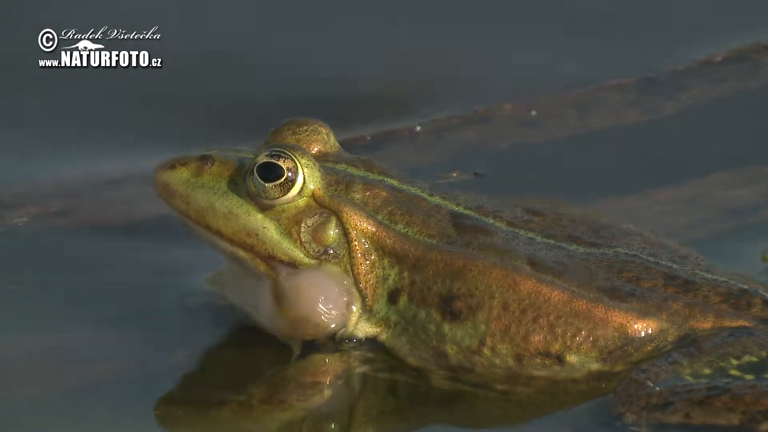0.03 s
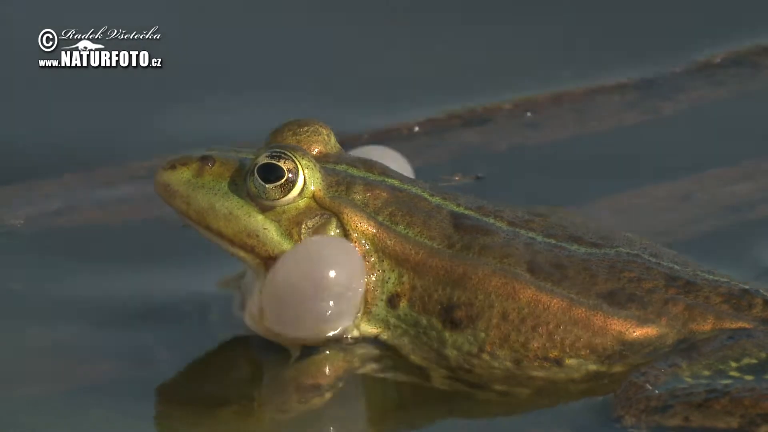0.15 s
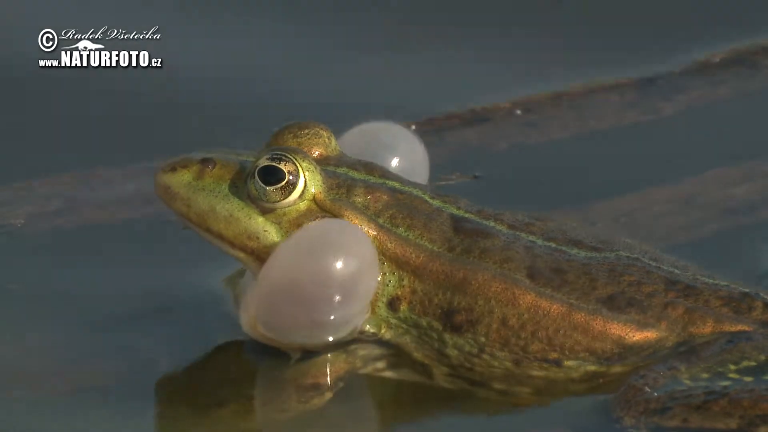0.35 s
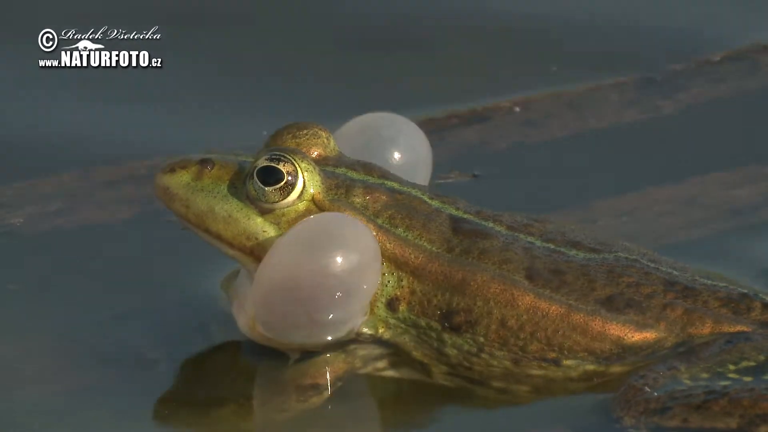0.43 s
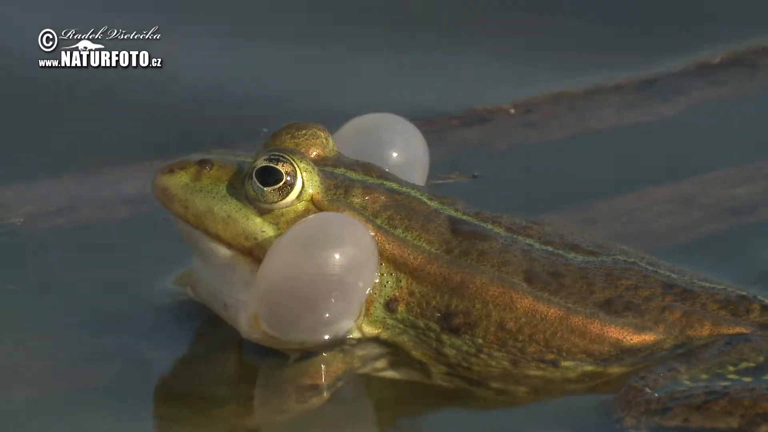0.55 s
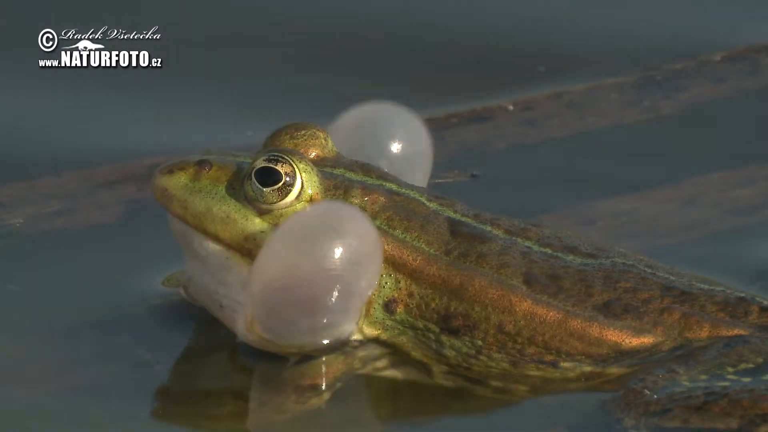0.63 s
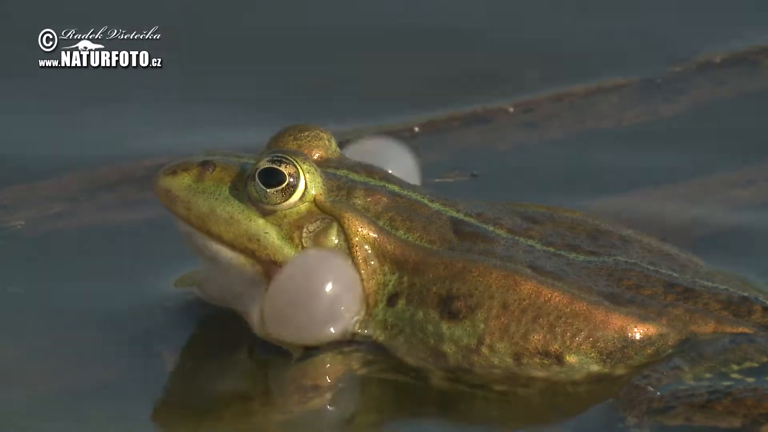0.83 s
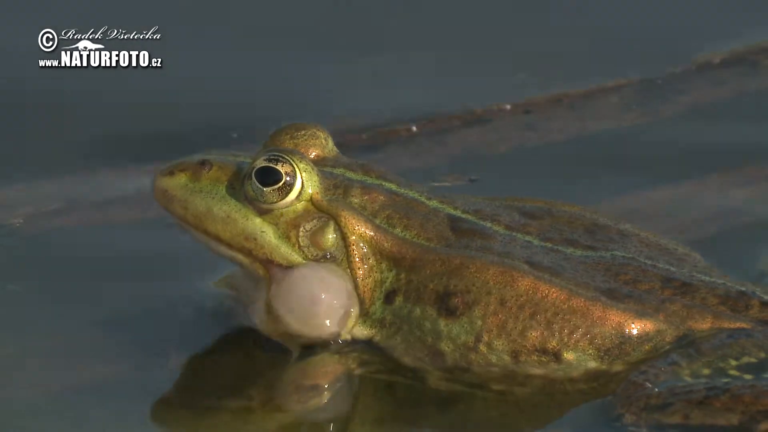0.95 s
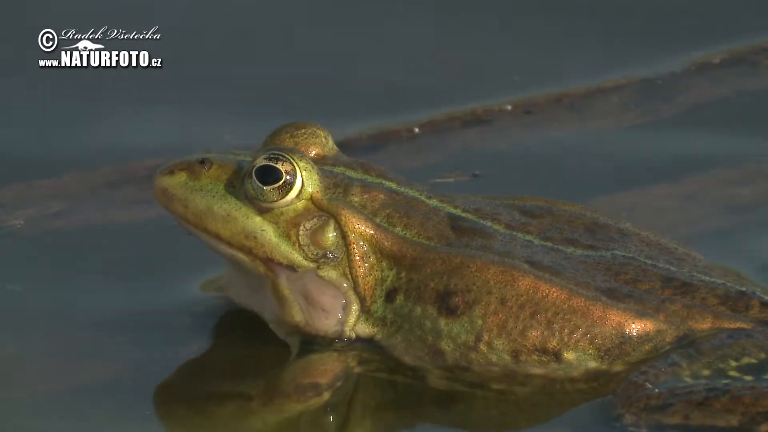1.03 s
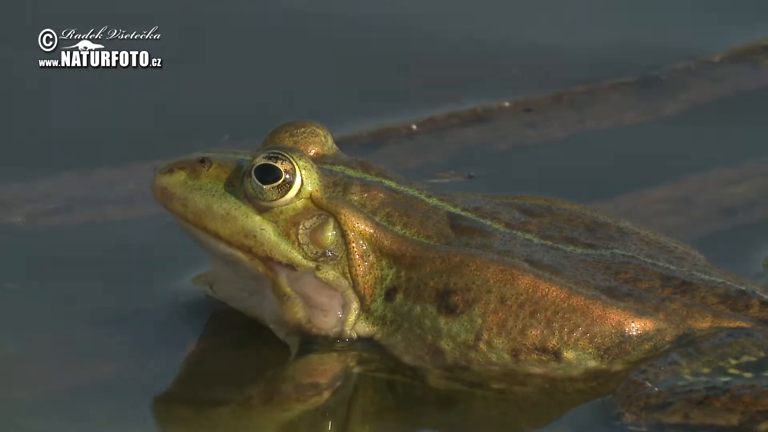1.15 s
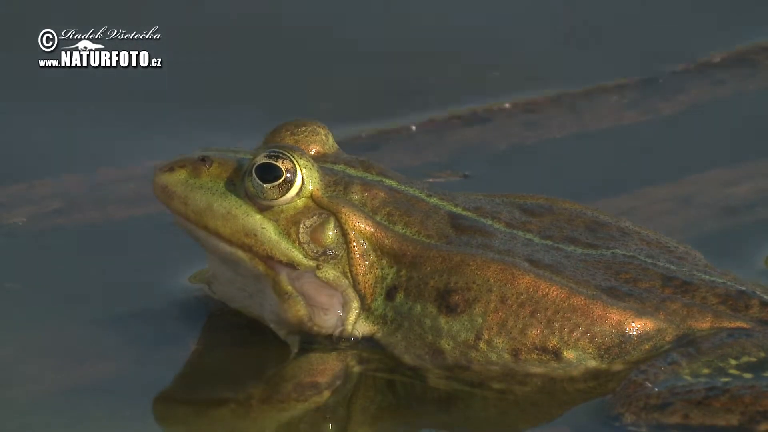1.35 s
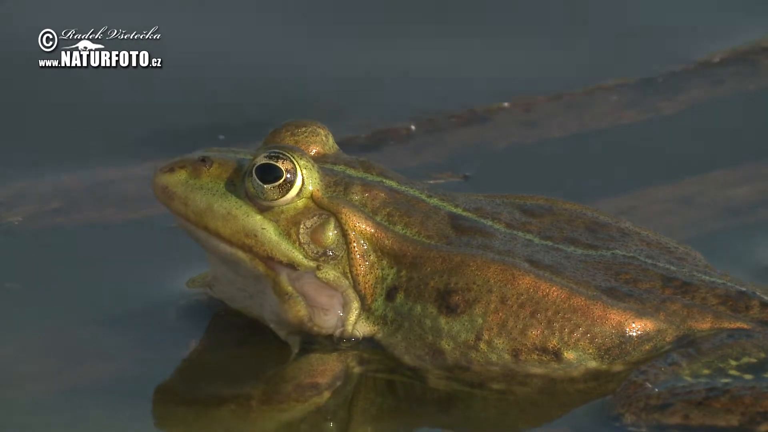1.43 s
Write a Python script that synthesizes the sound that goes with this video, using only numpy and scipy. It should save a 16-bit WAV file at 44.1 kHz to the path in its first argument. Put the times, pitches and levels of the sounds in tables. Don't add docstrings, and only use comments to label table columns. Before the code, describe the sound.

Close frogs give overlapping hard, throaty rattles by quiet water, then a softer rattle fades out.

```python
import sys
import numpy as np
from scipy import signal
from scipy.fft import rfft, irfft, next_fast_len
from scipy.io import wavfile
from scipy.ndimage import uniform_filter1d

SR = 44100
rng = np.random.default_rng(int(sys.argv[2]) if len(sys.argv) > 2 else 0)


def wrap_up_sound(samples):
    columns = np.atleast_2d(samples).T
    tamed = np.clip(columns, -1, 1)
    steps = np.round(tamed * 32767).astype(np.int16)
    wavfile.write(sys.argv[1], SR, steps)


def field_ratio(decibels):
    return 10 ** (np.asarray(decibels, dtype=float) / 20)


N = 66150

# f/Hz, density/dB
AIR_COLOUR = [(150, -10), (360, -19), (600, -14), (1900, -32), (4500, -34), (7000, -40), (15700, -37)]
RUMBLE_COLOUR = [(8.8, -36.5), (15, -2), (38, -1.5), (57, -11.5), (145, -20), (250, -35), (320, -66.5),
                 (550, -120)]
AIR_DB, RUMBLE_DB = -72.5, -62.5
# f/Hz, coherence
COHERENCE = [(30, 0.98), (150, 0.97), (600, 0.95), (3000, .4), (9000, .2)]
# f/Hz, level/dB
HUM = [(50, -69), (296, -84)]
# t/s, duration/s, level/dB, f/Hz
CROAKS = [
    (-.03, 0.074, -57.5, 283),
    (.105, .035, -72, 283),
    (0.148, .04, -65, 278.5),
    (1.084, .04, -61.5, 263),
    (1.225, .08, -55, 260),
]
# multiple of the pitch, level/dB
CROAK_HARMONICS = [(2, -2), (3, -21), (6, -7), (9, 2), (12, -18.5)]
# t/s, duration/s, level/dB, start f/Hz, end f/Hz
CHEEPS = [
    (.11, .025, -81, 4050, 3950),
    (1.27, .065, -78, 4000, 3000),
    (1.285, .055, -79, 4600, 3600),
]
# t/s, level/dB
RASPS = [
    (0.899, -71),
    (1.011, -72.5),
    (1.126, -72),
    (1.233, -78),
]
# f/Hz, bandwidth/Hz, level/dB
RASP_BANDS = [(5146, 750, 6), (5800, 630, -7), (6850, 900, -8), (14800, 1500, -8)]
RASP_S = .075
# t/s, level/dB
CHORUS_SWELL = [
    (0.148, -80.5),
    (0.301, -50),
    (.6, -43.5),
    (1.001, -49),
    (1.248, -59),
    (1.5, -53),
]
# f/Hz, level/dB, t60/s
CHORUS_MODES = [(5250, -36, .008)]
CHORUS_PER_S, CHORUS_HZ, CHORUS_SPREAD = 360, 1913, 0.03

# t/s of main click, level/dB, gap before it/ms, growth per click/dB,
# gap to one late click/ms (1 or less: none)
NEAR_BURSTS = [(.1745, -34, 4.3, 1.5, 5.8), (.2072, -30.5, 5.6, 6.5, 7.4), (.2488, -28, 5.5, 4, 1),
               (.2961, -22.5, 6, 4.5, 9.8), (.3404, -22.5, 5.3, 4, 1), (.3929, -19.5, 6.2, 5.5, 11.1),
               (.4435, -18, 6.4, 4, 12.1), (.4962, -18.5, 5.5, 8.5, 10.5), (.5482, -18.5, 6.3, 8, 8),
               (.6049, -17, 5.1, 4.5, 6.1), (.6596, -18.5, 4.8, 4, 1), (.7151, -18, 4.2, 6, 5.7)]
RIGHT_BURSTS = [(.5241, -35, 2.3, 12, 17), (.5757, -30, 3.8, 2.5, 2.5), (.6372, -28, 3.8, 4.1, 1),
                (.673, -24.5, 4.8, 6, 1), (.7345, -22, 3.5, 12, 0.5), (.7729, -16.5, 6.5, 8, 14.9),
                (.8244, -16, 5, 10, 13.7), (.8817, -15.5, 7.1, 7.5, 12.1), (.9426, -14.5, 6.8, 6.3, 1),
                (1.0018, -14.5, 7.1, 7, 1), (1.0618, -17, 6.5, 6.5, 13.1), (1.123, -19, 5.6, 4.5, 8.6),
                (1.1756, -19.5, 4.94, 5, 5.2)]
LEFT_BURSTS = [
    (1.1603, -38, 6.5, 4.4, -1.5),
    (1.2208, -31, 5.3, 5.2, 9.5),
    (1.2761, -31.5, 5.6, 5.5, 1),
    (1.3324, -33, 5.2, 6, 1),
    (1.3924, -28.5, 5.6, 5.5, 7.7),
    (1.4459, -31, 5, 2.5, 1),
    (1.4965, -34.5, 4.8, 6, 2),
]
# t/s, level/dB
NEAR_CLICKS = [(0.187, -39), (.2557, -24), (.3474, -20), (.6652, -18), (.6971, -29), (0.2238, -38),
               (.2653, -30.5), (0.3615, -32), (.423, -39.5), (.6276, -24.5), (0.6784, -19), (0.7254, -19),
               (0.7352, -28.5), (0.7459, -34.5)]
RIGHT_CLICKS = [
    (.469, -35.5),
    (0.4766, -31),
    (.6814, -19),
    (1.1856, -21),
    (1.191, -17.5),
    (1.1986, -18.5),
    (1.2132, -30.5),
]
LEFT_CLICKS = [(1.2512, -42.5), (.5714, -29), (.6924, -31), (1.2835, -29), (1.3065, -36), (1.3391, -29),
               (1.4136, -39), (1.4521, -29), (1.3592, -41.5), (1.423, -37.5), (1.4673, -35), (1.4731, -39)]
FAR_CLICKS = [
    (0.8491, -30),
    (.8564, -34),
    (.911, -30.5),
    (0.9525, -39),
    (0.9624, -33.5),
    (0.9707, -32),
    (1.0142, -33.5),
    (1.0223, -32),
]
# t/s, ring f/Hz, body thump level/dB
NEAR_SAC = [
    (.165, 1170, -10.5),
    (.2, 1543, -18),
    (.25, 1802, -21.5),
    (.4, 1963, -25.5),
    (.55, 2028, -23),
    (.6, 1772, -23),
    (.66, 1764, -24),
    (.725, 1830, -20),
    (.745, 1620, -0.5),
]
RIGHT_SAC = [
    (.5, 1843, -18),
    (0.682, 1797, -20),
    (0.734, 2032, -23.5),
    (.78, 2045, -24),
    (.89, 2135, -27),
    (1.003, 2094, -28),
    (1.059, 1907, -26.5),
    (1.12, 1735, -22),
    (1.193, 1810, -19),
    (1.216, 2050, -0.5),
]
LEFT_SAC = [
    (.7, 1930, -40),
    (1.23, 2170, -48.5),
    (1.34, 2210, -21.5),
    (1.395, 2074, -31),
    (1.449, 1880, -25),
]
FAR_SAC = [
    (.9, 1830, -13),
]
# f/Hz, level/dB, t60/s
NEAR_MODES = [(3300, -40, .002), (5300, -31.5, .009), (5900, -46, .004), (4300, -36, .002),
              (10400, -41, .004), (11500, -41, .004), (12700, -37.5, .005), (15300, -49, .003)]
RIGHT_MODES = [(3700, -31, .003), (4280, -29, .0049), (5100, -25.5, .009), (14600, -63.5, .0044)]
LEFT_MODES = [(3700, -40, .003), (5100, -39.5, 0.01), (11000, -52, .006)]
# delay/ms, left gain, right gain
ECHOES = [(1.3, 0.067, 0.083), (2.4, 0.061, -0.061), (6.5, 0.17, -0.059), (11.5, .08, -.08)]

QUICK_GAP_MS, GAP_SHRINK, RISE_S = 3.7, 0.44, 0.001158
LATE_DB, LATE_DB_PER_MS, LATE_FLOOR_DB = 12, 2.8, -0.9
THUMP_HZ, THUMP_RATIO, THUMP_T60_S = 428, .225, 0.041
SLAP_HZ, SLAP_T60_S, SLAP_DB = 970, 0.0016, 6
SLACK_LOSS, TAUT_DB, LOOSE_POWER = .55, -20, 1.6
TAUT_HZ, TAUT_POWER = 1750, 10
BRIGHT_POWER = 0.55
PITCH_SCATTER, PUFF_S, PUFF_SHARE = .01, .0008, .45
LOW_CUT_HZ = 340
POND_T60_S, POND_DB = 0.42, -17.5
TWIST_HZ, TWIST_WIDTH_HZ = 2900, 250


def resonate(x, hz, width):
    turn = np.exp(2j * np.pi * np.cumsum(hz * np.ones(len(x))) / SR)
    r = np.exp(-np.pi * width / SR)
    return 2 * (turn * signal.lfilter([1 - r], [1, -r], x / turn + 1e-18)).real


def ring(clicks, hz, t60):
    width = np.log(1000) / np.pi / t60
    return resonate(clicks, hz, width) / (2 * (1 - np.exp(-np.pi * width / SR)))


def evened(x):
    return x / np.sqrt(np.mean(x ** 2) + 1e-20)


def bump(start, length):
    return np.sin(np.pi * np.clip((np.arange(N) / SR - start) / length, 0, 1))


def place(x, lag_ms, pan_db, twist=0):
    size = next_fast_len(N + 2048)
    hz = np.fft.rfftfreq(size, 1 / SR)
    paths = 1
    for ms, left, right in ECHOES:
        paths = paths + np.array([[left], [right]]) * np.exp(-2j * np.pi * hz * ms / 1000)
    phase = 2 * np.pi * hz * lag_ms / 1000 + twist / (1 + np.exp((TWIST_HZ - hz) / TWIST_WIDTH_HZ))
    side = np.array([[.5], [-.5]])
    spectrum = rfft(x, size) * paths * field_ratio(side * pan_db) * np.exp(-1j * side * phase)
    return irfft(spectrum, size)[:, :N]


def noise(colour, level_db, patchy_db):
    frames, hz = N // 256 + 5, np.fft.rfftfreq(1024, 1 / SR)
    a, b, c, d, patches = rng.standard_normal((frames, 513, 5)).T
    patches = uniform_filter1d(uniform_filter1d(patches, size=10, axis=0), size=10, axis=1)
    patches = evened(patches)

    def read(points):
        f, value = np.transpose(points)
        return np.interp(np.log(hz + 1), np.log(f + 1), value)[:, None]

    same = np.clip(read(COHERENCE), -1, 1)
    left = a + 1j * b
    right = same * left + np.sqrt(1 - same ** 2) * (c + 1j * d)
    z = np.array([left, right]) * field_ratio(read(colour) + patchy_db * patches)
    return field_ratio(level_db) * evened(signal.istft(z, nperseg=1024, noverlap=768)[1][:, :N])


def steady_hum():
    t = np.arange(N) / SR
    return sum(field_ratio(db + 5) * np.sin(2 * np.pi * hz * t) for hz, db in HUM)


def croaking_neighbour():
    t = np.arange(N) / SR
    croak = 0
    for s, length, db, pitch in CROAKS:
        tone = sum(field_ratio(d) * np.sin(2 * np.pi * k * pitch * t) for k, d in CROAK_HARMONICS)
        croak = croak + field_ratio(db) * bump(s, length) * tone
    rough = 1 + .25 * evened(uniform_filter1d(rng.standard_normal(N), size=250))
    return place(croak * rough, lag_ms=0.038, pan_db=-0.5)


def bird_cheeps():
    t = np.arange(N) / SR
    cheep = 0
    for s, length, db, start_hz, end_hz in CHEEPS:
        hz = np.interp(t, [s, s + length], [start_hz, end_hz])
        cheep = cheep + field_ratio(db) * bump(s, length) * np.sin(2 * np.pi * np.cumsum(hz) / SR)
    return place(cheep, lag_ms=0.03, pan_db=6.0)


def chorus():
    strength = field_ratio(3. * np.minimum(rng.exponential(1, N), 3))
    clicks = strength * (rng.random(N) < CHORUS_PER_S / SR)
    who, out = rng.integers(0, 4, N), 0
    for k, (tone, side) in enumerate(rng.uniform(-1, 1, (4, 2))):
        sac = [(0, CHORUS_HZ * (1 + CHORUS_SPREAD * tone), -66.5)]
        voice = frog(clicks * (who == k), sac, CHORUS_MODES, t60=0.0083)
        out = out + place(voice, lag_ms=.04 * side, pan_db=-3 * side)
    return evened(out) * field_ratio(np.interp(np.arange(N) / SR, *np.transpose(CHORUS_SWELL)))


def cord_clicks(bursts, singles, start=0, count=7):
    rows, k = list(singles), np.arange(count)
    for s, db, gap_ms, growth_db, late_ms in bursts:
        gaps_ms = QUICK_GAP_MS + (gap_ms - QUICK_GAP_MS) * GAP_SHRINK ** k
        back_ms = np.cumsum(gaps_ms)
        rows.append((s, db))
        rows += zip(s - back_ms / 1000, db - growth_db * (k + 1))
        if late_ms > 1:
            rows.append((s + late_ms / 1000, db + max(LATE_DB - LATE_DB_PER_MS * late_ms, LATE_FLOOR_DB)))
    s, db = np.transpose([row for row in rows if row[0] > start])
    at = np.clip(((s - RISE_S) * SR).astype(int), 0, N - 1)
    return -np.bincount(at, field_ratio(db), N)


def sac_tones(clicks, hz, t60, size=1500):
    at, u = np.flatnonzero(clicks)[:, None], np.arange(size) / SR
    pitch = (hz * (1 + PITCH_SCATTER * rng.standard_normal(N)))[at]
    fade = t60 * np.minimum(pitch / TAUT_HZ, 1) ** LOOSE_POWER
    tones = clicks[at] * field_ratio(-60 * u / fade) * np.cos(2 * np.pi * pitch * u)
    return np.bincount((at + np.arange(size)).ravel(), tones.ravel(), N + size)[:N]


def bright_modes(clicks, hz, modes):
    snap = np.minimum(hz / TAUT_HZ, 1) ** TAUT_POWER * abs(clicks) ** BRIGHT_POWER
    r = np.exp(-1 / (PUFF_S * SR))
    breath = rng.standard_normal(N) * signal.lfilter([np.sqrt(1 - r ** 2)], [1, -r], snap)
    puff = (1 - PUFF_SHARE) * snap + PUFF_SHARE * breath
    return sum(field_ratio(db) * ring(ring(puff, f, t60), f, t60 / 3) * 20 / (t60 * SR) for f, db, t60 in modes)


def frog(clicks, sac, modes, t60=0.025, soft_hz=2500, slap_db=0):
    t = np.arange(N) / SR
    s, sac_hz, sac_thump_db = np.transpose(sac)
    hz, thump_db = np.interp(t, s, sac_hz), np.interp(t, s, sac_thump_db)
    push = clicks * field_ratio(thump_db)
    slack = field_ratio(-SLACK_LOSS * np.maximum(thump_db - TAUT_DB, 0))
    tones = sac_tones(clicks * slack, hz, t60)
    thump = ring(push, np.maximum(THUMP_RATIO * hz, THUMP_HZ), THUMP_T60_S)
    slap = field_ratio(SLAP_DB + slap_db) * ring(push, SLAP_HZ, SLAP_T60_S)
    soft = signal.sosfilt(signal.butter(6, soft_hz, fs=SR, output="sos"), tones - thump + slap)
    low_cut = signal.butter(4, LOW_CUT_HZ, "high", fs=SR, output="sos")
    return signal.sosfilt(low_cut, soft + bright_modes(clicks, hz, modes))


def near_frog():
    clicks = cord_clicks(NEAR_BURSTS, NEAR_CLICKS, start=.161)
    voice = frog(clicks, NEAR_SAC, NEAR_MODES, t60=.02, soft_hz=2437, slap_db=5.5)
    return place(voice, lag_ms=.017, pan_db=-1.2, twist=0.33)


def pond_scatter(x):
    t = np.arange(SR // 4) / SR
    sparse = rng.standard_normal((2, len(t))) * (rng.random((2, len(t))) < .05)
    tail = sparse * field_ratio(-60 * t / POND_T60_S) * (t > .004)
    return signal.fftconvolve(x, tail / np.linalg.norm(tail[0]), axes=1)[:, :N]


def right_frog():
    clicks = cord_clicks(RIGHT_BURSTS, RIGHT_CLICKS)
    voice = frog(clicks, RIGHT_SAC, RIGHT_MODES, t60=0.02, soft_hz=2390, slap_db=-5)
    return place(voice, lag_ms=.055, pan_db=-1.44, twist=2.3)


def left_frog():
    voice = frog(cord_clicks(LEFT_BURSTS, LEFT_CLICKS), LEFT_SAC, LEFT_MODES, t60=0.014)
    return place(voice, lag_ms=-.033, pan_db=-2.5)


def far_frog():
    voice = frog(cord_clicks([], FAR_CLICKS), FAR_SAC, LEFT_MODES)
    return place(voice, lag_ms=.075, pan_db=-2.0)


def bird_rasps():
    hiss = rng.standard_normal(N)
    breath = sum(field_ratio(db) * evened(resonate(resonate(hiss, hz, w), hz, w)) for hz, w, db in RASP_BANDS)
    envelope = sum(field_ratio(db) * bump(s, RASP_S) for s, db in RASPS)
    return place(breath * envelope, lag_ms=0.03, pan_db=6.0)


def scene():
    background = noise(AIR_COLOUR, AIR_DB, patchy_db=-1.5) + noise(RUMBLE_COLOUR, RUMBLE_DB, patchy_db=1.7)
    background = background + steady_hum() + croaking_neighbour() + bird_cheeps() + chorus() + bird_rasps()
    frogs = near_frog() + right_frog() + left_frog() + far_frog()
    return background + frogs + field_ratio(POND_DB) * pond_scatter(frogs)


def band_limit(x):
    return signal.sosfilt(signal.butter(12, 15810, fs=SR, output="sos"), x)


def record(dry):
    return band_limit(dry)


dry = scene()
out = record(dry)
wrap_up_sound(out)
```